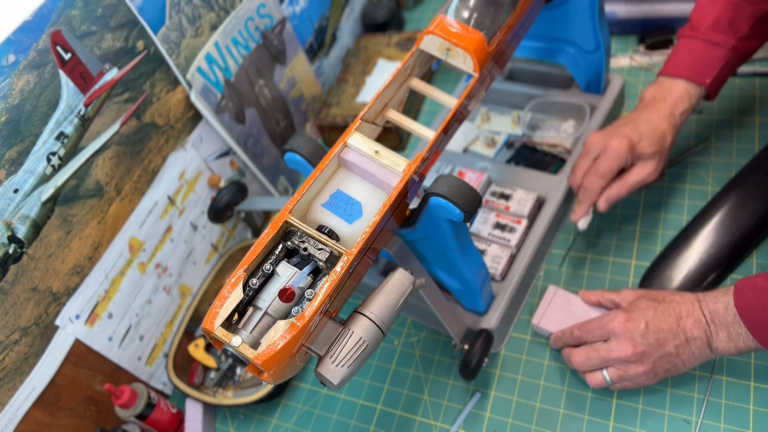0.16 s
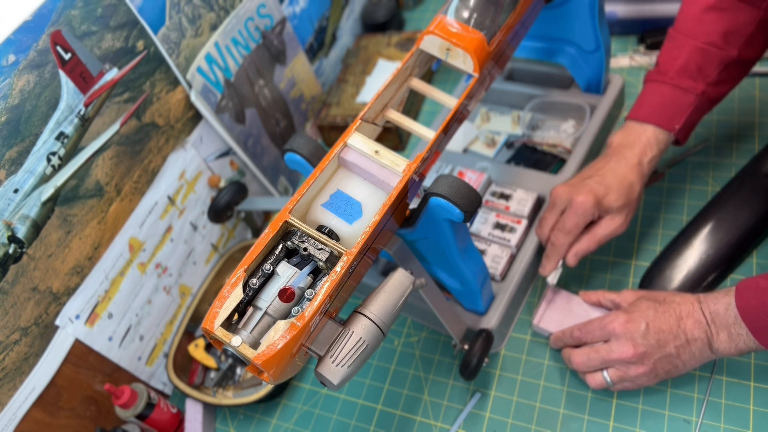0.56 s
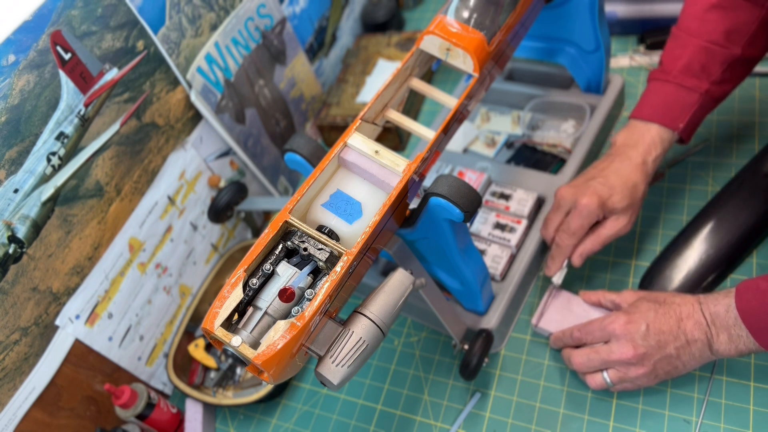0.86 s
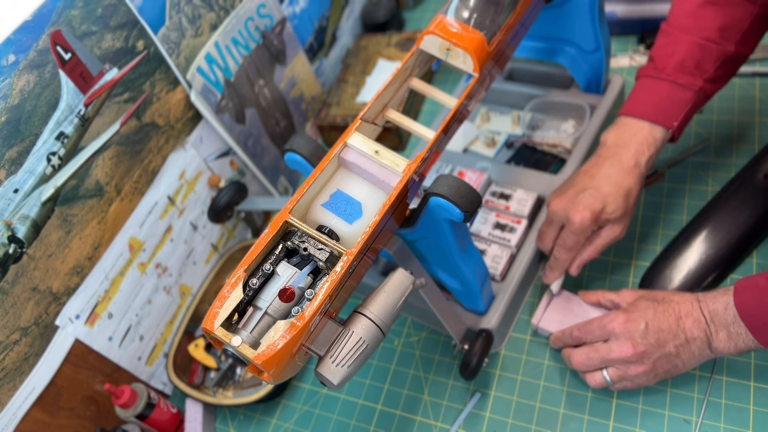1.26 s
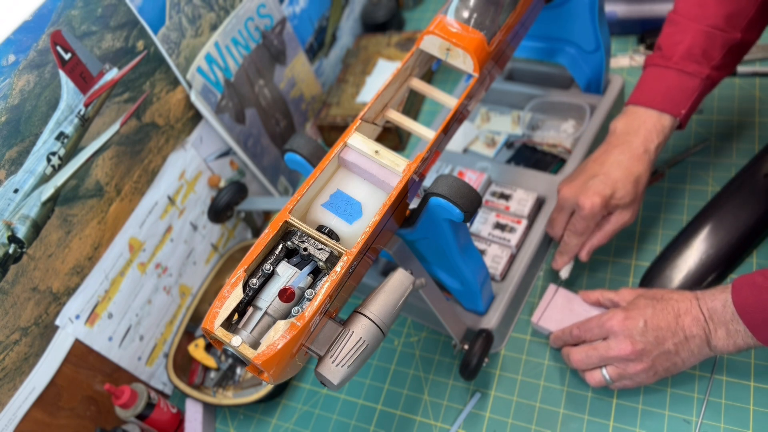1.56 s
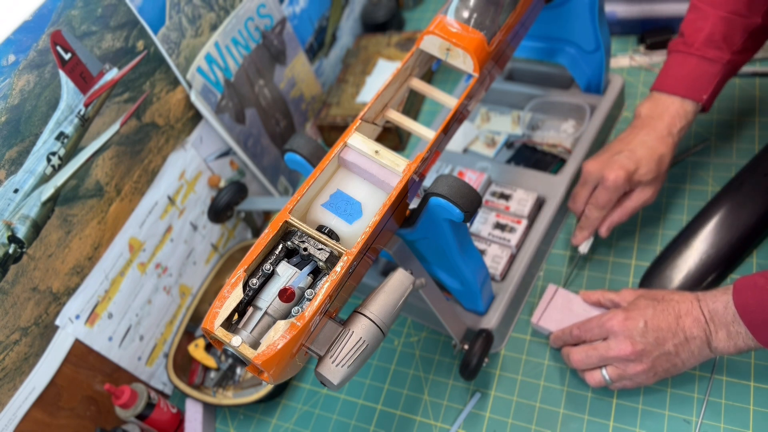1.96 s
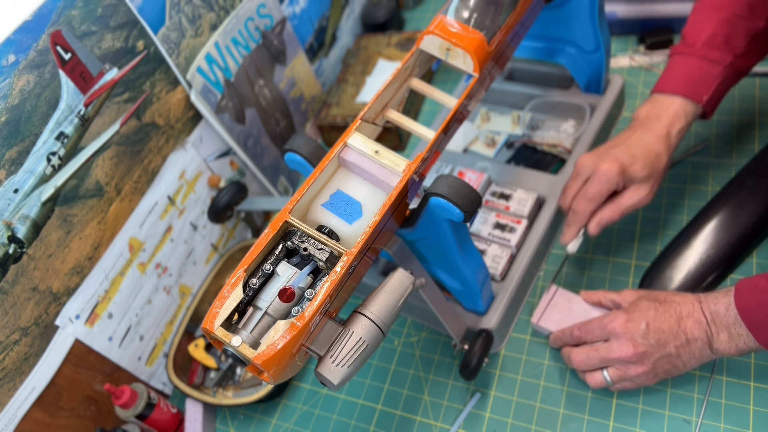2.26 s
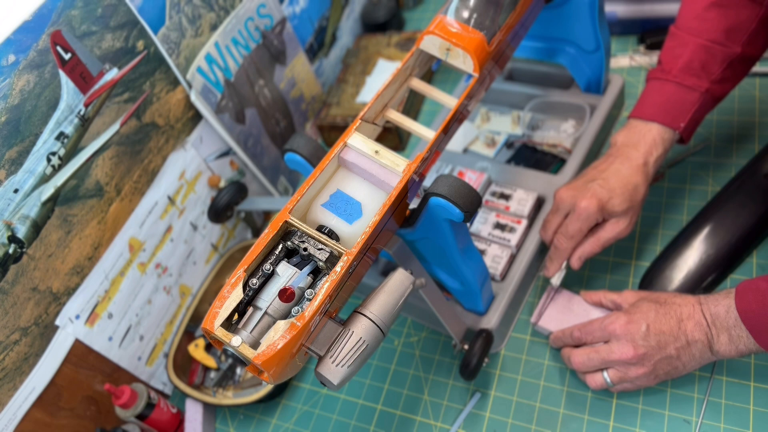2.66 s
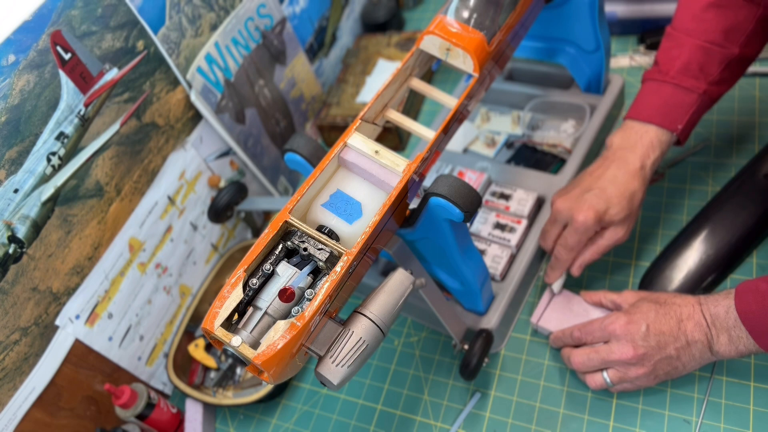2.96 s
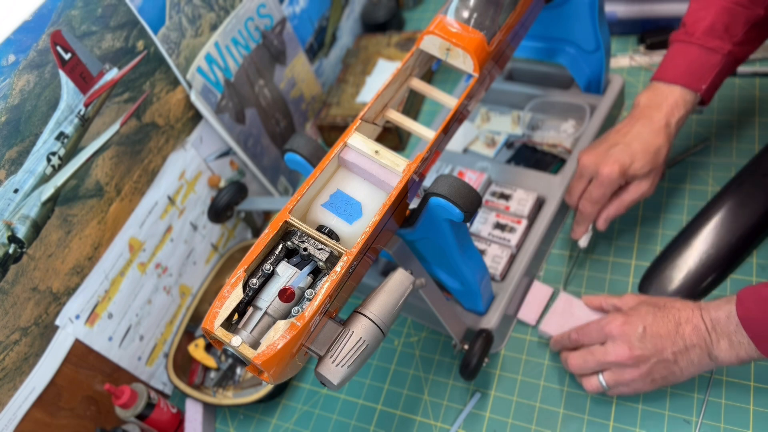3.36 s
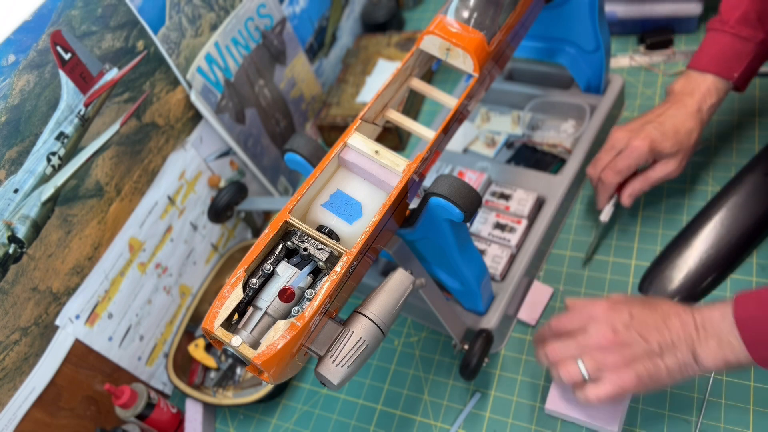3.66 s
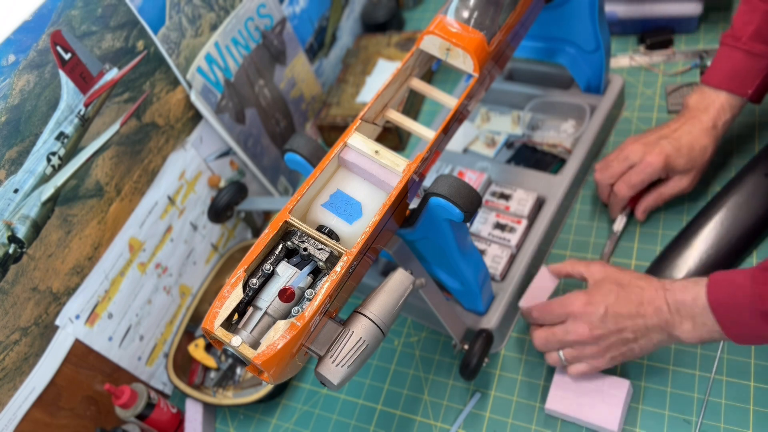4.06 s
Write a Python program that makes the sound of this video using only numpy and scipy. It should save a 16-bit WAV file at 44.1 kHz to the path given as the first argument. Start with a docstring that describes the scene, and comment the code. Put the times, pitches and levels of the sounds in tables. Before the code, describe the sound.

Scratchy, slightly squeaky knife cuts through a foam block end in crisp snaps, followed by a slide and light knocks.

```python
"""A hobby knife cuts a piece off a block of stiff foam on a workbench, over a small workshop's low rumble.
After an opening knock, the blade plunges in at 0.9 s and slices; bursting cells hiss and squeal,
and the foam gives way with a snap at 1.9 s. A second pass from 2.7 s follows the kerf and snaps at 3 s.
The block slides aside over the cutting mat at 3.3 s and is set down around 4 s, ringing the bench.
Knife and fingers tick in between."""
import sys
import numpy as np
from scipy import signal
from scipy.fft import rfft, irfft
from scipy.io import wavfile
from scipy.ndimage import map_coordinates

SR = 44100
rng = np.random.default_rng(int(sys.argv[2]) if len(sys.argv) > 2 else 0)


def output_pcm(signal):
    """Save a mono or channel-first signal as 16-bit PCM at the path in sys.argv[1].

    Samples are clipped to [-1, 1] before scaling.
    """
    pcm = np.clip(np.atleast_2d(signal).T, -1, 1) * 32767
    wavfile.write(sys.argv[1], SR, np.round(pcm).astype(np.int16))


N = 185175
TIME = np.arange(N) / SR
TAPS = 4096
HZ = np.fft.rfftfreq(TAPS, 1 / SR)


def gain_of(db):
    """Decibels to amplitude factor."""
    return 10 ** (np.asarray(db) / 20)


def unit_rms(x):
    """Scales to rms 1."""
    return x / np.sqrt(np.mean(x ** 2) + 1e-20)


def curve(points, hz):
    """Interpolates (Hz, value) points over log frequency."""
    point_hz, value = np.transpose(points)
    return np.interp(np.log(hz + 1), np.log(point_hz + 1), value)


def colour(x, db):
    """Minimum-phase filter with gains db on the grid HZ."""
    log_gain = np.log(gain_of(np.r_[db, db[-2:0:-1]]))
    response = np.fft.ifft(np.exp(np.conj(signal.hilbert(log_gain)))).real
    return signal.oaconvolve(x, response)[:len(x)]


def noise(points):
    """Steady noise shaped by (Hz, dB) points; rms 1 above 20 Hz."""
    hz = np.fft.rfftfreq(N, 1 / SR)
    spectrum = rfft(rng.standard_normal(N)) * gain_of(curve(points, hz))
    return irfft(spectrum, N) / np.std(irfft(spectrum * (hz > 20), N))


def flutter(per_s):
    """Random wobble, rms near 1."""
    return np.interp(TIME * per_s, np.arange(N), rng.standard_normal(N))


def push(start_s, length_s, db, attack_s, rise_db):
    """Envelope of one push: the hand takes hold, leans in or tires, and eases off."""
    t = TIME - start_s
    release_s = min(0.06, 0.5 * length_s)
    attack = np.sin(np.pi / 2 * np.clip(t / attack_s, 0, 1))
    release = np.sin(np.pi / 2 * np.clip((length_s - t) / release_s, 0, 1)) ** 2
    progress = np.clip(t / length_s, 0, 1)
    return attack * release * gain_of(db + rise_db * (progress - 0.5))


def crack(t60_s, edge):
    """A sharp first break of height edge, then a dying crumble; energy 1."""
    crumble = rng.standard_normal(TAPS * 2) * gain_of(-60 * TIME[:TAPS * 2] / t60_s)
    crumble[0] = edge
    return crumble / np.linalg.norm(crumble)


def ring(modes):
    """Decaying modes, each signed by where the blow lands; energy 1."""
    t = TIME[:TAPS * 2]
    sound = sum(rng.choice([-1, 1]) * gain_of(db - 60 * t / t60_s) * np.sin(2 * np.pi * hz * t)
                for hz, db, t60_s in modes)
    return sound / np.linalg.norm(sound)


def blow(sound, db, hz, octaves, skirt_db):
    """The contact favours a band around hz; db is the rms of the first 4 ms."""
    detuning = np.log2((HZ + 20) / hz) / octaves
    shaped = colour(sound, -skirt_db * np.log1p(detuning ** 2))
    attack = shaped[:SR // 250]
    return gain_of(db) * shaped / np.sqrt(np.mean(attack ** 2))


def room_rumble(db=-45):
    """Steady low noise of the room."""
    # Each row: frequency in Hz, relative density in dB.
    spectrum = [(5, 2), (21, -5.5), (32, -13.5), (46, -26), (61, -16.5), (85, -33), (127, -26), (150, -36),
                (270, -35), (400, -43.5), (540, -39), (750, -51), (1600, -62), (16000, -77)]
    return gain_of(db) * noise(spectrum)


def room_echoes(x, wet_db=-13.5, delay_s=0.0046, echoes_per_s=4000):
    """Adds dense echoes from the cluttered bench and near walls; the mids last longest."""
    # Each row: frequency in Hz, T60 in seconds.
    decay = [(200, 0.098), (1500, 0.22), (5000, 0.17), (15000, 0.16)]
    t = TIME[:SR // 2]
    echoes = rng.standard_normal(len(t)) * (rng.random(len(t)) < echoes_per_s / SR) * (t > delay_s)
    hz, frame_s, frames = signal.stft(echoes, SR, nperseg=256)
    fade = gain_of(-60 * frame_s / curve(decay, hz)[:, None])
    tail = signal.istft(frames * fade, SR, nperseg=256)[1]
    return x + gain_of(wet_db) * signal.fftconvolve(x, tail / np.linalg.norm(tail))[:N]


def jostling():
    """The hands jostle the bench: swells of deep noise."""
    # Each row: start and length in seconds, level in dB, attack in seconds, rise over the push in dB.
    jostles = [(3.891, 0.306, -40.5, .02, -4), (4.125, .14, -29.5, .05, 0)]
    # Each row: frequency in Hz, relative density in dB.
    spectrum = [(25, 3.5), (60, -1.5), (110, -20), (300, -26.5), (2000, -69.5)]
    return sum(push(*row) for row in jostles) * noise(spectrum)


def add(mix, start_s, sound):
    """Mixes a sound in at start_s."""
    part = mix[max(round(start_s * SR), 0):][:len(sound)]
    part += sound[:len(part)]


def tick(db, hz, octaves):
    """A light contact that hardly rings."""
    return blow(crack(t60_s=0.026, edge=1.0), db, hz, octaves, skirt_db=12.0)


def ticks():
    """Light contacts of knife and fingers."""
    # Each row: start in seconds, level in dB, band centre in Hz, spread in octaves.
    contacts = [(.0935, -54, 3330, 0.11), (2.074, -56, 5700, .12), (2.503, -55.5, 2340, 0.3),
                (2.526, -57.5, 6500, 0.64), (3.3398, -52, 2985, 1.5), (3.821, -50, 3330, 0.61),
                (3.8703, -37, 6100, .5), (3.8728, -32.5, 6760, 0.17), (3.887, -45.5, 7140, 0.55),
                (4.108, -57, 4000, 0.8), (4.1654, -35.5, 4040, 0.36), (4.1928, -35, 3770, 0.52)]
    out = np.zeros(N)
    for start_s, db, hz, octaves in contacts:
        add(out, start_s, tick(db, hz, octaves))
    return out


def bench(db, hz, octaves):
    """A blow rings the bench and mat."""
    # Each row: frequency in Hz, relative level in dB, T60 in seconds.
    modes = [(204, 0, 0.06), (298, 1.5, 0.029), (383, -3.5, 0.071), (492, -7, 0.16), (575, -3.5, 0.091),
             (714, -1.5, 0.03), (826, -6.5, 0.079), (958, -2.5, 0.057), (1106, 3.5, 0.031),
             (1320, 1.5, .025), (2015, -9, .05)]
    return blow(ring(modes) + 2.3 * crack(t60_s=0.011, edge=10.0), db, hz, octaves, skirt_db=9.0)


def knocks():
    """Things set down on the bench, each with a thud, a clack and a tick; the faint one at 2.07 s is the blade
    lifting off the mat."""
    # Each row: start in seconds, thud in dB, clack in dB, clack centre in Hz, tick in dB.
    landings = [(0.022, -34, -30, 800, -35), (.0924, -52.5, -53, 800, -43), (2.069, -53.5, -53, 890, -54),
                (3.872, -55, -47, 1300, -50), (3.8944, -38, -35.5, 1240, -59),
                (4.1327, -31.5, -33.5, 1190, -37)]
    out = np.zeros(N)
    for start_s, thud_db, clack_db, clack_hz, tick_db in landings:
        thud = bench(thud_db, hz=407, octaves=0.65)
        clack = bench(clack_db, clack_hz, octaves=0.41)
        add(out, start_s, thud + clack + tick(tick_db, hz=2600, octaves=0.79))
    return out


def effort(kind):
    """Envelope of the hands' pushes on knife or block in one kind of stroke, summed by power."""
    # Each row: kind, start and length in seconds, level in dB, attack in seconds, rise in dB.
    pushes = [ ("slide", 0, 0.039, -43, 0.0014, -2.5), ("touch", 0.694, 0.13, -59.5, 0.01, 1),
              ("plunge", 0.907, 0.24, -46, 0.0608, 7.9), ("plunge", 1.15, 0.1, -64.5, .02, 3),
              ("slice", 1.214, .215, -47.5, .014, -4), ("slice", 1.375, .615, -48, .1, -7.5),
              ("touch", 2.01, 0.097, -64.5, .04, 2), ("kerf", 2.667, 0.068, -58, 0.034, 0),
              ("kerf", 2.72, .1, -62, .02, -2), ("kerf", 2.795, .1, -58.5, 0.025, 2),
              ("kerf", 2.858, .114, -51.5, .045, -4.5), ("finish", 2.976, 0.2, -48.5, .085, 0),
              ("finish", 3.14, .205, -53.5, .04, 3), ("slide", 3.346, 0.21, -39, 0.063, -4),
              ("grip", 3.66, 0.344, -59.5, .16, 2), ("grip", 4.01, 0.13, -50.5, 0.046, 2),
              ("grip", 4.13, 0.15, -43, .02, 3.5)]
    return np.sqrt(sum(push(*row) ** 2 for name, *row in pushes if name == kind))


def near_reflections(x, path_s=0.0016, strength=0.2, drift=0.07):
    """Reflections off mat, hand and toolbox comb the hiss; their paths drift with the motion."""
    out = x.copy()
    for _ in range(3):
        delay_s = path_s * rng.uniform(0.5, 2) * (1 + drift * flutter(per_s=2))
        out += strength * map_coordinates(x, [np.arange(N) - delay_s * SR], order=3)
    return out


def stroke(kind, spectrum, resonances=(), cells_per_s=8000, grain_db=1.5, rub=0.84, judder_db=0.77):
    """Foam cells burst one by one over a smooth rub while the pressure judders."""
    sizes = gain_of(grain_db * np.minimum(rng.exponential(1, N), 5)) * rng.choice([-1, 1], N)
    cells = unit_rms(sizes * (rng.random(N) < cells_per_s / SR))
    drive = (cells + rub * rng.standard_normal(N)) * gain_of(judder_db * flutter(per_s=140))
    peaks_db = sum(db / (1 + (2 * (HZ - hz) / width_hz) ** 2) for hz, width_hz, db in resonances)
    hiss = colour(drive, curve(spectrum, HZ) + peaks_db)
    return effort(kind) * unit_rms(near_reflections(hiss))


def handling():
    """The block rubs over the mat and fingers grip the offcut."""
    # Each row: frequency in Hz, relative density in dB.
    slide_spectrum = [(200, -1.5), (500, -3.5), (1500, -4), (2150, -1.5), (3100, -5.5), (4700, 2.5),
                      (6500, -2.5), (8600, -1.5), (11000, -9), (16000, -12)]
    grip_spectrum = [(150, 0.5), (450, 12.5), (1200, -1.5), (2200, -9), (4200, -14.5), (7000, -23.5),
                     (16000, -36.5)]
    return stroke("slide", slide_spectrum) + stroke("grip", grip_spectrum)


def sing(hz, width_hz):
    """Random slips feed a broad resonance that follows the curve hz; rms 1."""
    low_pass = signal.butter(2, width_hz / 2, fs=SR, output="sos")
    slips = signal.sosfilt(low_pass, rng.standard_normal((2, N)))[:, :len(hz)]
    carrier = np.exp(2j * np.pi * np.cumsum(hz) / SR)
    return unit_rms((carrier * (slips[0] + 1j * slips[1])).real)


def singing():
    """Bands sing with a stroke; a harder push travels faster, so they glide faster."""
    # Each row: kind, first, last and width in Hz, level against the stroke in dB, rise in dB.
    bands = [("plunge", 7750, 7250, 750, -2.5, -2), ("slice", 3080, 2750, 260, -14.5, -12),
             ("slice", 3900, 5300, 800, -11.5, 3), ("slice", 10200, 9100, 1300, -14.5, 2),
             ("slice", 11000, 14000, 1700, -14.5, 9), ("kerf", 1400, 1630, 130, -18.5, 10),
             ("kerf", 2450, 2600, 450, -12, 8), ("slide", 2300, 2100, 370, -12, -19)]
    out = np.zeros(N)
    for kind, first_hz, last_hz, width_hz, db, rise_db in bands:
        envelope = effort(kind)
        travel = np.cumsum(envelope) / envelope.sum()
        glide_hz = first_hz + (last_hz - first_hz) * travel
        out += envelope * gain_of(db + rise_db * (travel - 0.5)) * sing(glide_hz, width_hz)
    return out


def squeals(relative_width=0.17):
    """The foam sticks and slips: short squeals swell, glide and fade."""
    # Each row: middle and length in seconds, level in dB, first and last pitch in Hz.
    glides = [(1.25, 0.087, -47.5, 7300, 7700), (3.501, 0.071, -38.5, 5900, 5020)]
    out = np.zeros(N)
    for middle_s, length_s, db, first_hz, last_hz in glides:
        n = round(length_s * SR)
        squeal = sing(np.linspace(first_hz, last_hz, n), relative_width * first_hz)
        add(out, middle_s - length_s / 2, gain_of(db) * np.hanning(n) * squeal)
    return out


def snaps(after_s=0.0014, after_db=-7.5):
    """The foam gives way: the block rings, a weaker break follows and the blade jolts the bench. The weaker,
    lower rows at 2.58, 3.22 and 3.28 s are the blade striking the mat, sounded the same way."""
    # Each row: start in seconds, level in dB, band centre in Hz, spread in octaves, jolt in dB.
    breaks = [(1.4983, -35.5, 9000, 2.3, -65), (1.938, -20, 5200, 1.65, -25.5),
              (2.5758, -39, 1950, 0.94, -49), (3.0494, -23.5, 9000, 2.7, -43),
              (3.2236, -53, 1100, 1.9, -49.5), (3.2843, -43.5, 1400, 1.2, -42.5)]
    # Each row: frequency in Hz, relative level in dB, T60 in seconds.
    block_modes = [(2125, -1, 0.017), (2900, -4.5, .014), (3954, 0, 0.012), (4930, 3.5, 0.011),
                   (5980, -2, 0.012), (6800, 0.5, 0.00865), (7440, 3, .010), (8600, 5.5, 0.0071),
                   (9346, 1.5, 0.011), (11040, -0.5, 0.0056), (14400, -11, .006)]
    out = np.zeros(N)
    for start_s, db, hz, octaves, jolt_db in breaks:
        first = ring(block_modes) + crack(t60_s=0.021, edge=0.84)
        second = crack(t60_s=0.01, edge=1.0)
        add(out, start_s, blow(first, db, hz, octaves, skirt_db=7.5))
        add(out, start_s + after_s, blow(second, db + after_db, hz, octaves, skirt_db=10.0))
        add(out, start_s, bench(jolt_db, hz=960, octaves=0.5))
    return out


def cutting():
    """The first pass touches, plunges and slices; the second finds the kerf and finishes the cut."""
    # Hiss of each stroke. Each row: frequency in Hz, relative density in dB.
    touch_spectrum = [(900, -32), (1800, -17), (2300, 1), (4000, -0.5), (5200, -2.5), (8000, -1.5),
                      (11000, -10.5), (16000, -16)]
    plunge_spectrum = [(500, -24), (2100, -14), (4200, -1.5), (6200, 0.5), (8000, -3), (8600, -2.5),
                       (10800, -4), (11700, -10), (16000, -13)]
    slice_spectrum = [(400, -11.5), (1200, -8), (2000, -3.5), (2900, -0.5), (4400, 1), (5900, -2.5),
                      (7600, 0.5), (9800, -3.5), (11300, -8), (15500, -6)]
    kerf_spectrum = [(600, 10.5), (1300, -10.5), (2300, -10), (3400, -6), (5000, -0.5), (8000, -0.5),
                     (11000, -2.5), (16000, -5.5)]
    finish_spectrum = [(500, 0.5), (1800, -7.5), (3000, 1), (4200, -0.5), (5800, -1.5), (9600, 3),
                       (10600, -7.5), (12500, -2), (16000, -4.5)]
    # Peaks lifted on the hiss: the first set are partials of the blade squeaking as it sticks and slips in the
    # kerf, the second ring through the finishing stroke. Each row: centre and width in Hz, lift in dB.
    squeak_partials = [(2320, 870, 13.5), (5050, 480, 10.5), (7420, 650, 11), (14300, 600, 3)]
    finish_resonances = [(4230, 300, 7.2), (6270, 280, 5.4), (10000, 190, 4.2)]
    return (stroke("touch", touch_spectrum)
            + stroke("plunge", plunge_spectrum)
            + stroke("slice", slice_spectrum, grain_db=2.0)
            + stroke("kerf", kerf_spectrum, squeak_partials, cells_per_s=1700, judder_db=1.8)
            + stroke("finish", finish_spectrum, finish_resonances, cells_per_s=4100, judder_db=2.3))


def scene():
    """Knife, foam and hands in the room, over its rumble; mono."""
    background = room_rumble() + jostling()
    work = cutting() + singing() + squeals() + handling() + snaps() + knocks() + ticks()
    return (background + room_echoes(work))[None]


def record(dry):
    """Band limit and soft ends."""
    cutoff_hz = 15950
    low_pass = signal.firwin(511, cutoff_hz, window=("kaiser", 9), fs=SR)
    fades = signal.windows.tukey(N, 0.0015)
    return signal.oaconvolve(dry * fades, low_pass[None], "same")


dry = scene()
out = record(dry)
output_pcm(out)
```